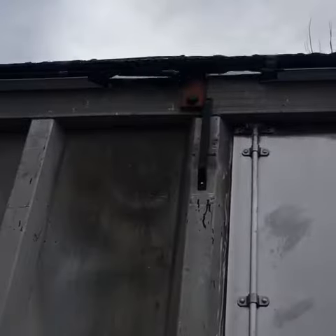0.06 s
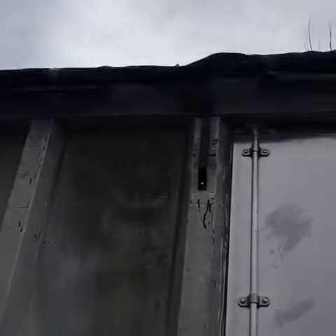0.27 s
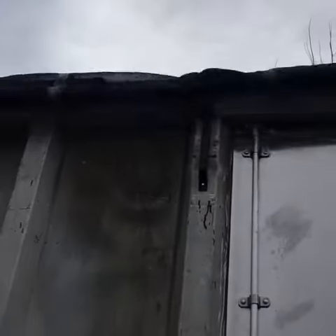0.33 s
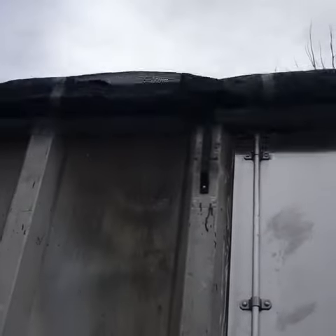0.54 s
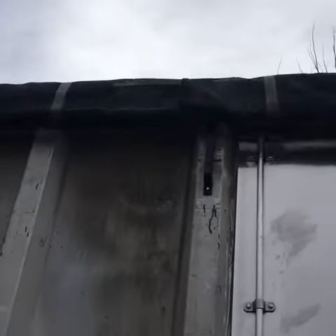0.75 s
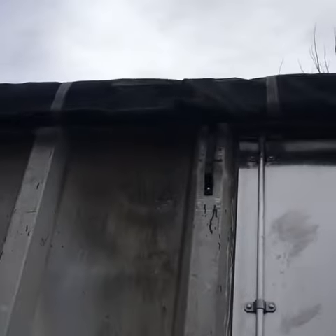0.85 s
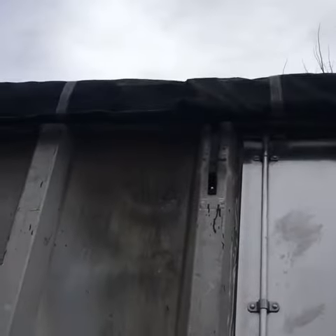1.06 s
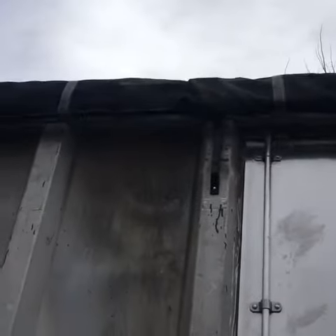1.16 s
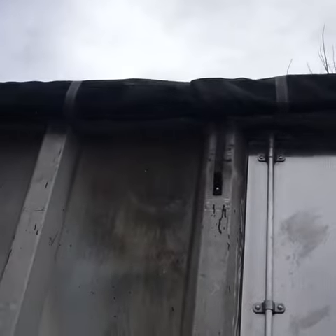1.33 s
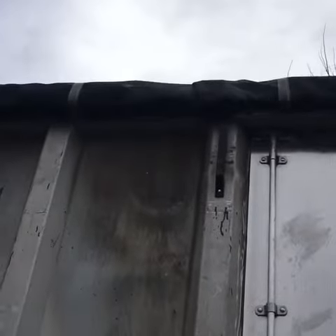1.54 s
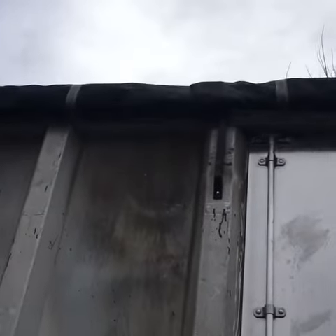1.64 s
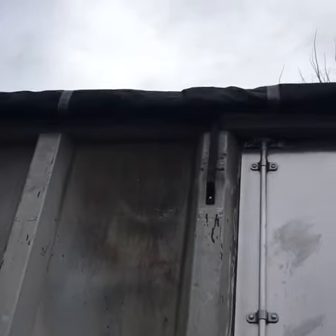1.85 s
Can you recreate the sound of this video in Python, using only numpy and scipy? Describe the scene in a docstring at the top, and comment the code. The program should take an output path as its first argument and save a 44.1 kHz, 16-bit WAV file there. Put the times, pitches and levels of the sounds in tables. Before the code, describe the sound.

A tarp roll clatters and thumps onto a metal trailer, the fabric scraping as its tube knocks on the rail. A heavier thump booms inside and a few small knocks follow, with faint wind and a far engine idling outside.

```python
"""Outdoors, at a metal trailer: a rolled tarp is swung over the top and lands with a thump.
The stiff fabric crinkles and drags; its steel tube clacks and knocks on the rail; hardware rattles out.
Contacts ring the wall and rail. The roll's weight flexes the wall, its sliding makes a panel sing,
and the hollow inside booms. A distant engine idles under light wind."""
import sys
import numpy as np
from scipy import signal
from scipy.fft import rfft, irfft, next_fast_len
from scipy.io import wavfile
from scipy.ndimage import map_coordinates

SR = 44100
rng = np.random.default_rng(int(sys.argv[2]) if len(sys.argv) > 2 else 0)


def dump(signal):
    """Clip the signal to [-1, 1] and save it as 16-bit WAV at the path in sys.argv[1]."""
    limited = np.clip(np.atleast_2d(signal).T, -1, 1)
    pcm = np.round(limited * 32767).astype(np.int16)
    wavfile.write(sys.argv[1], SR, pcm)


N = 83790
TIME_S = np.arange(N) / SR

# tube and hardware on the rail (time [s], level [dB], tilt [dB/octave], t60 [s])
CLACK_HITS = [(0.217, -25, -2.5, 0.065), (0.2654, -9.5, 3, 0.066), (0.351, -9.5, -5, 0.051),
              (0.3995, -15, -5.5, 0.073), (0.4430, -14.5, -1.5, 0.037), (0.4489, -14, -4, 0.054),
              (.459, -26.5, 1, 0.28), (0.5245, -20.5, -2, 0.094), (.611, -32.5, 1.5, 0.21),
              (.672, -30.5, -1.5, 0.55), (0.7785, -16.5, -0.5, 0.045), (.787, -17.5, -1.5, 0.099),
              (.8085, -8, -1.5, 0.033), (.868, -31.5, 2, 0.28), (.989, -26, 0, 0.11),
              (1.1015, -27.5, -3, 0.064), (1.206, -30, -1, 0.1)]
# crack of a hard contact (frequency [Hz], level [dB])
CRACK_SPECTRUM = [(150, 0.5), (420, -4), (600, -4.5), (1200, -3), (2000, 0.5), (2900, -4), (3800, -1.5),
                  (5000, -10.5), (6500, -7.5), (9000, -20), (11000, -23.5), (16000, -36)]
# steel roll tube (frequency [Hz], level [dB], t60 [s])
TUBE_MODES = [(1144, -1.5, 0.21), (1866, 1.5, 0.17), (2160, 4, 0.031), (3330, -5, 0.043),
              (3470, -16, 0.038), (3763, -3, 0.2), (4140, 4, 0.049), (6490, -6, 0.11), (8800, -1, 0.057)]
# padded contacts and a few pitched metal clinks (time [s], level [dB], centre [Hz], half-width [octaves])
KNOCK_HITS = [(.217, -20.5, 680, 0.35), (.244, -16.5, 734, 0.17), (.304, -10.5, 328, .55),
              (.311, -9.5, 763, 0.14), (0.313, -14.5, 1180, 0.37), (0.356, -14, 1500, 0.11),
              (.362, -13, 390, 0.2), (.391, -7.5, 257, 0.38), (0.398, -18.5, 1730, 0.53),
              (.42, -14, 276, 0.74), (.446, -16, 1690, 0.39), (.556, -18, 720, 0.21),
              (.567, -17.5, 860, 0.2), (.75, -30, 3350, .1), (.779, -12, 435, 0.29), (.78, -23, 4150, 0.29),
              (.806, -12, 372, .28), (.809, -17, 2140, 0.18), (.809, -18.5, 3680, 0.12),
              (.832, -27, 1100, 0.1), (.99, -16.5, 328, 0.96), (1.018, -13.5, 241.5, .3),
              (1.102, -37, 3420, 0.043), (1.21, -17.5, 230, .3)]
# wall flexing under the roll (time [s], level [dB], frequency [Hz], t60 [s])
THUD_HITS = [(0.305, -10.5, 190, 0.065), (0.371, -29, 46, 0.1), (0.374, -4.5, 156.4, 0.12),
             (0.394, -7, 102, 0.1), (.414, -4, 117, 0.044), (0.466, -14.5, 145, 0.45),
             (.535, -15, 212.8, 0.39), (0.605, -11.5, 57.2, 0.18), (0.611, -7.5, 188.7, 0.097),
             (0.788, 1, 139.3, 0.09), (0.787, -16.5, 59.8, 0.95), (.796, -2.5, 247.3, 0.063),
             (.837, -7.5, 87, 0.19), (0.838, -14.5, 166, 0.22), (0.982, -7.5, 125, 0.19),
             (1.018, -8, 152.7, 0.15), (1.023, -18, 100, 0.092)]
# fabric rubbing (time [s], level [dB])
DRAG_LEVELS = [(0.201, -47), (0.221, -28), (.3, -21.5), (.38, -25), (.46, -23.5), (.51, -34), (0.569, -21),
               (.65, -36), (0.699, -33.5), (.765, -31), (0.834, -20.5), (0.891, -30), (0.966, -61),
               (1.009, -30.5), (1.118, -41.5), (1.299, -51)]
# fabric rubbing (frequency [Hz], level [dB])
DRAG_SPECTRUM = [(100, 12.5), (400, 9.5), (560, 9), (900, 8), (2000, 2.5), (2900, -5.5), (3800, -7.5),
                 (5200, -11), (6700, -12), (9000, -21), (11000, -26), (16000, -41)]
# sheet-metal wall (frequency [Hz], level [dB], t60 [s])
WALL_MODES = [(289, -3, 0.31), (414.4, -7, 0.33), (467, -1, 0.33), (725.4, 0, 0.5), (778, -12, 0.32),
              (848, -17, 0.28), (913, 8.5, 0.069), (1159, -5, 0.18), (1470, 12, 0.088), (1885, 5.5, 0.17),
              (2183, -1, 0.18)]
# top rail (frequency [Hz], level [dB], t60 [s])
RAIL_MODES = [(1740, -24, 0.58), (1598, -0.5, 0.31), (1840, 4, 0.94), (1880, 7, 0.64), (2060, 1, 0.86),
              (3374, 7.5, 0.54), (3580, 3, 0.66), (6460, -2, .45)]
# decay inside the trailer (frequency [Hz], t60 [s])
HOLLOW_DECAY = [(50, 6.3), (130, 1.5), (200, 2.44), (300, 1.45), (500, 1.29), (2000, 0.47), (6000, 0.56),
                (14000, 0.26)]
# response inside the trailer (frequency [Hz], gain [dB])
HOLLOW_GAIN = [(30, -17), (70, 10), (140, -7), (210, -1.5), (400, -3), (2000, -13), (6000, -17),
               (14000, -9)]
# singing wall panel (time [s], level [dB])
PANEL_LEVELS = [(.52, -52), (.575, -17.5), (.635, -29), (.69, -23), (.77, -29.5), (1.05, -57)]
# creasing fabric (time [s], level [dB])
CRINKLE_LEVELS = [(.205, -60), (0.221, -42), (.262, -49), (0.299, -63)]
# creasing fabric (frequency [Hz], level [dB])
CRINKLE_SPECTRUM = [(2000, -20), (6500, -14), (9000, 6), (14000, 2), (16000, -12)]
# wind rumble (time [s], level [dB])
WIND_LEVELS = [(0, -31), (.2, -34), (1.3, -27), (1.65, -30), (1.9, -34)]
# wind rumble (frequency [Hz], level [dB])
WIND_SPECTRUM = [(20, -9), (35, -7), (75, -6.5), (100, -2.5), (130, -14), (190, -9.5), (280, -35),
                 (600, -54), (3000, -87)]
# distant hiss (frequency [Hz], level [dB])
HISS_SPECTRUM = [(60, -3), (200, 4), (420, 1), (550, -3), (1000, -1), (1500, -7.5), (2400, -11.5),
                 (4000, -18), (8000, -30), (12000, -35.5), (16000, -50)]


def clacks(clank_vs_crack_db=-9):
    """Hard contacts: a dense crack plus the tube's clank, both brighter for sharper hits."""
    out = np.zeros(N)
    for start_s, db, tilt_db_oct, t60_s in CLACK_HITS:
        crack = noise(lambda hz: at_hz(CRACK_SPECTRUM, hz) + tilt_db_oct * np.log2((hz + 200) / 2000))
        crack *= strike_envelope(rise_s=0.00085, t60_s=t60_s)
        clank = modes(TUBE_MODES, drift_rad=0.18, tilt_db_oct=tilt_db_oct)
        clank *= amp(clank_vs_crack_db) * np.linalg.norm(crack)
        add(out, start_s, amp(db) * (crack + clank))
    return out


def knocks():
    """Contacts padded by fabric excite only a band of the metal's modes; a very narrow band makes a small
    pitched clink."""
    out = np.zeros(N)
    envelope = strike_envelope(rise_s=0.0026, t60_s=0.076)
    for start_s, db, centre_hz, half_width_oct in KNOCK_HITS:
        band = noise(lambda hz: -15 * np.log10(1 + (np.log2((hz + 1) / centre_hz) / half_width_oct) ** 4))
        knock = envelope * band
        add(out, start_s, amp(db) * knock * np.linalg.norm(envelope) / np.linalg.norm(knock))
    return out


def wall_thuds():
    """Each heavy push sets the wall swinging as a damped sine."""
    out = np.zeros(N)
    for start_s, db, hz, t60_s in THUD_HITS:
        envelope = strike_envelope(rise_s=0.0034, t60_s=t60_s)
        add(out, start_s, amp(db) * np.sin(2 * np.pi * hz * TIME_S) * envelope)
    return out


def fabric_drag(slips_per_s=9000, spread_db=2, flicker_db=2.4):
    """Stiff fabric rubs in dense clumps of tiny slips."""
    slips = (rng.random(N) < slips_per_s / SR) * rng.choice([-1, 1], N)
    slip_db = spread_db * np.minimum(rng.exponential(size=N), 4)
    rub = unit_rms(filtered(slips * amp(slip_db), lambda hz: amp(at_hz(DRAG_SPECTRUM, hz))))
    return rub * amp(contour_db(DRAG_LEVELS) + flicker_db * wobble(44.27))


def metal_ring(contacts, wall_db=-20.5, rail_db=-23.5):
    """Contacts ring the wall briefly, the top rail higher and longer."""
    wall = amp(wall_db) * modes(WALL_MODES, drift_rad=0.87)
    rail = amp(rail_db) * modes(RAIL_MODES, drift_rad=0.97)
    return signal.fftconvolve(contacts, wall + rail)[:N]


def hollow_boom(drive):
    """The hollow trailer reverberates, longest in the bass."""
    hz, time_s, noise_bins = signal.stft(rng.standard_normal(N), SR, nperseg=1024)
    t60_s = at_hz(HOLLOW_DECAY, hz)[:, None]
    equal_energy = np.sqrt(2 * np.log(1000) / (t60_s * SR))
    gain = equal_energy * amp(at_hz(HOLLOW_GAIN, hz))[:, None]
    tail = signal.istft(noise_bins * gain * decay(time_s, t60_s), SR, nperseg=1024)[1]
    return signal.fftconvolve(drive, tail[:N])[:N]


def wall_panel(mode_hz=320, drift_rad=0.34):
    """One wall mode, kept ringing by the sliding roll."""
    level_db = contour_db(PANEL_LEVELS, outside_db=-120) + wobble(25.6)
    return amp(level_db) * np.sin(2 * np.pi * mode_hz * TIME_S + drift_rad * wobble(27))


def fabric_crinkle(creases_per_s=1700):
    """Lifted fabric creases with a thin, high crackle."""
    ticks = (rng.random(N) < creases_per_s / SR) * rng.standard_normal(N)
    crease = rng.standard_normal(N) * strike_envelope(rise_s=0.0001, t60_s=0.013)
    crackle = signal.fftconvolve(ticks, crease)[:N]
    crackle = filtered(crackle, lambda hz: amp(at_hz(CRINKLE_SPECTRUM, hz)))
    return unit_rms(crackle) * amp(contour_db(CRINKLE_LEVELS, outside_db=-120))


def wind(hiss_db=-39.5):
    """Light wind: a slowly swelling rumble over steady distant hiss."""
    rumble = noise(lambda hz: at_hz(WIND_SPECTRUM, hz)) * amp(contour_db(WIND_LEVELS))
    return rumble + amp(hiss_db) * noise(lambda hz: at_hz(HISS_SPECTRUM, hz))


def engine(hum_hz=69.8, level_db=-38.5, pitch_wander=0.057, flicker_db=1.2):
    """A far engine idles: one tone, unsteady in pitch and level."""
    phase_rad = 2 * np.pi * np.cumsum(hum_hz * (1 + pitch_wander * wobble(12))) / SR
    hum = np.sin(phase_rad) * amp(flicker_db * wobble(8.7))
    return amp(level_db) * unit_rms(hum)


def modes(table, drift_rad, tilt_db_oct=0):
    """Damped modes with drifting random phases; unit energy."""
    time_s = TIME_S[:SR * 3 // 4]
    knots_s = np.linspace(0, time_s[-1], 40)
    ring = np.zeros(N)
    for hz, db, t60_s in table:
        drift = np.interp(time_s, knots_s, rng.standard_normal(len(knots_s)))
        phase_rad = 2 * np.pi * (hz * time_s + rng.random()) + drift_rad * drift
        gain = amp(db + tilt_db_oct * np.log2(hz / 2000))
        ring[:len(time_s)] += gain * np.sin(phase_rad) * decay(time_s, t60_s)
    return ring / np.linalg.norm(ring)


def amp(db):
    return 10 ** (np.asarray(db) / 20)


def unit_rms(x):
    return x / np.sqrt(np.mean(x ** 2) + 1e-20)


def at_hz(table, hz):
    """Table lookup on a log-frequency axis."""
    knots_hz, values = np.transpose(table)
    return np.interp(np.log(hz + 1), np.log(knots_hz + 1), values)


def contour_db(table, outside_db=None):
    return np.interp(TIME_S, *np.transpose(table), left=outside_db, right=outside_db)


def wobble(knots_per_s):
    """Smooth random curve, rms near 1."""
    return map_coordinates(rng.standard_normal(400), [TIME_S * knots_per_s], mode="wrap")


def filtered(x, gain_at_hz):
    size = next_fast_len(N + SR // 2)
    return irfft(rfft(x, size) * gain_at_hz(np.fft.rfftfreq(size, 1 / SR)), size)[:N]


def noise(db_at_hz):
    """Shaped noise, rms 1."""
    return unit_rms(filtered(rng.standard_normal(N), lambda hz: amp(db_at_hz(hz))))


def decay(time_s, t60_s):
    return np.exp(-np.log(1000) * time_s / t60_s)


def strike_envelope(rise_s, t60_s):
    return (1 - np.exp(-TIME_S / rise_s)) * decay(TIME_S, t60_s)


def add(track, start_s, sound):
    start = round(start_s * SR)
    track[start:] += sound[:N - start]


def scene():
    """Contacts ring the metal; both drive the hollow, along with the thuds. Mono."""
    thud_to_hollow_db = -1.5
    contacts = clacks() + knocks() + fabric_drag()
    direct = contacts + metal_ring(contacts)
    thuds = wall_thuds()
    boom = hollow_boom(direct + amp(thud_to_hollow_db) * thuds)
    return (direct + thuds + boom + fabric_crinkle() + wall_panel() + engine() + wind())[None]


def record(dry):
    """Soft clip at full scale, then low cut and band limit."""
    low_cut_hz, top_hz = 26, 16000
    clipped = dry[0] / (1 + np.abs(dry[0]) ** 8) ** (1 / 8)
    high_passed = filtered(clipped, lambda hz: 1 / np.sqrt(1 + (low_cut_hz / (hz + 1)) ** 10))
    return filtered(high_passed, lambda hz: hz < top_hz)[None]


dry = scene()
out = record(dry)
dump(out)
```